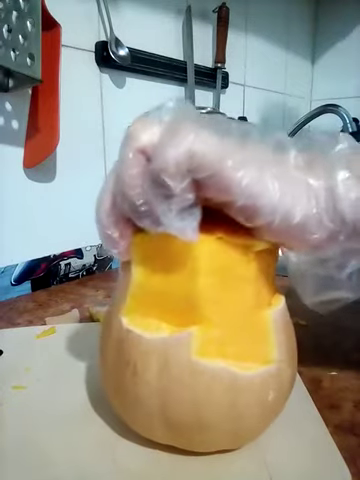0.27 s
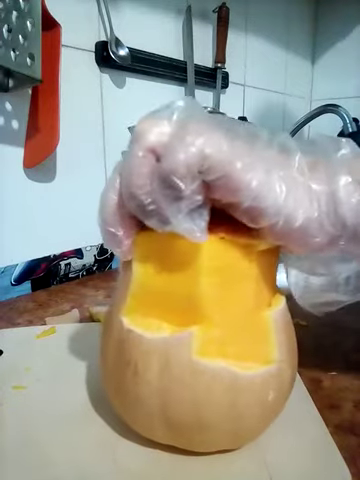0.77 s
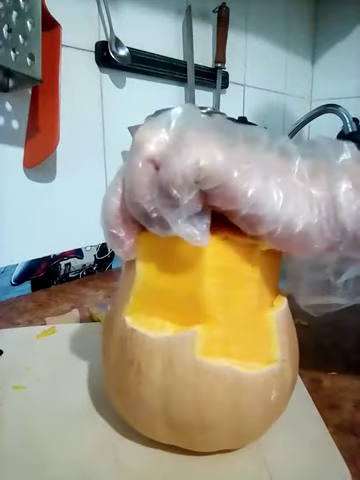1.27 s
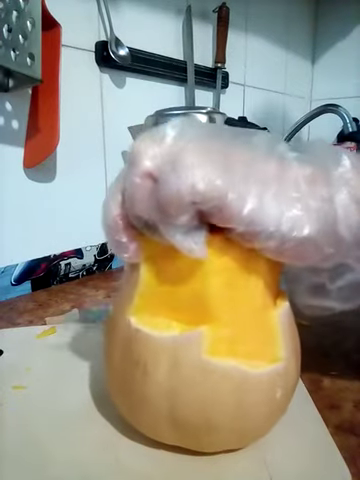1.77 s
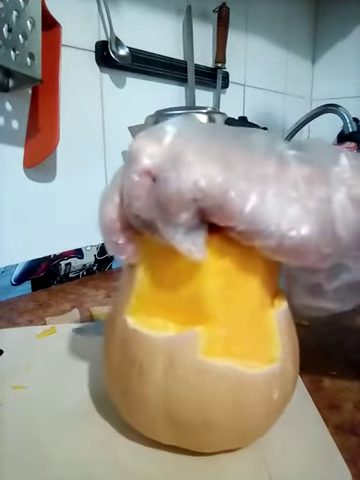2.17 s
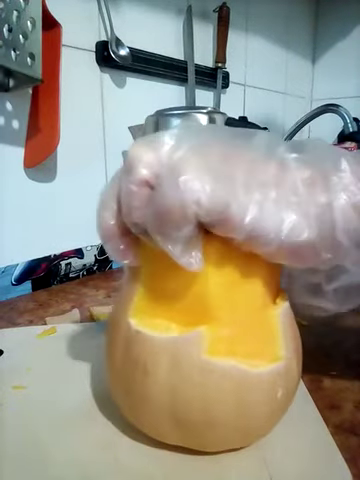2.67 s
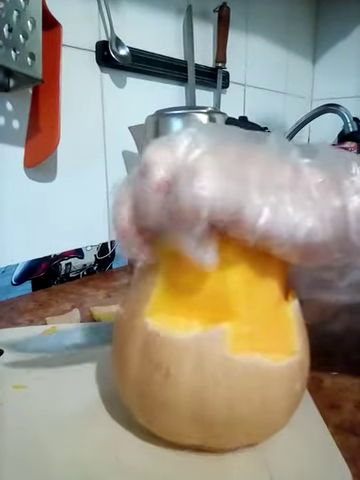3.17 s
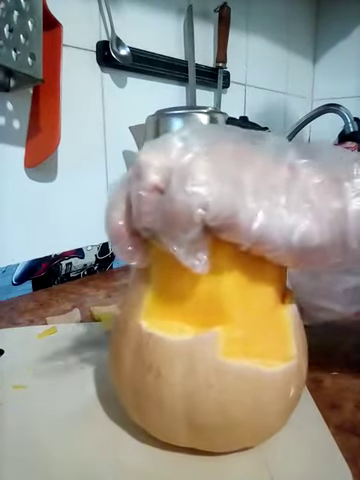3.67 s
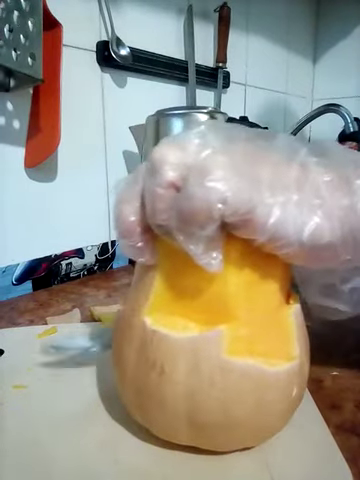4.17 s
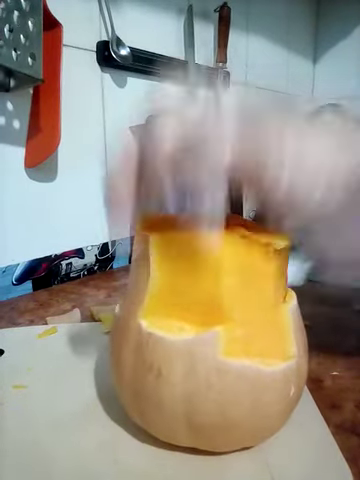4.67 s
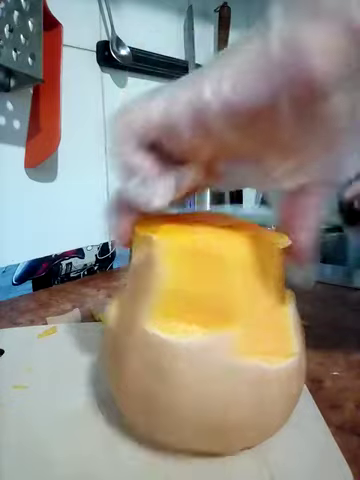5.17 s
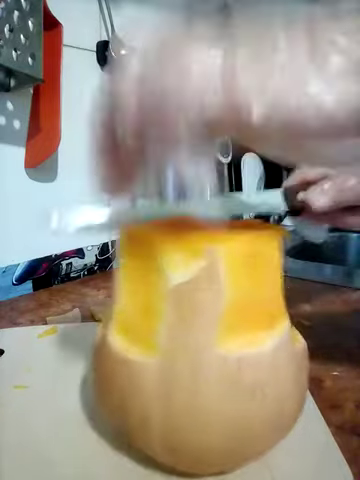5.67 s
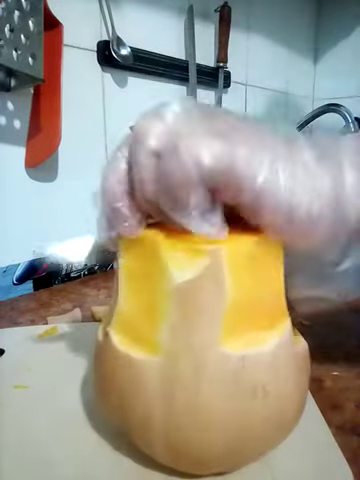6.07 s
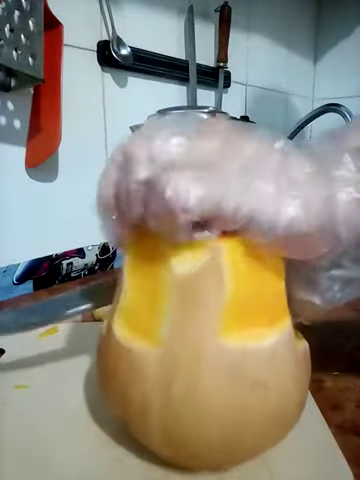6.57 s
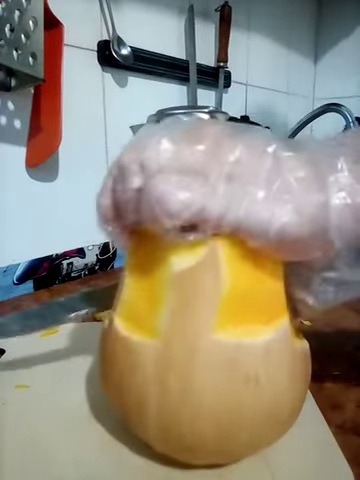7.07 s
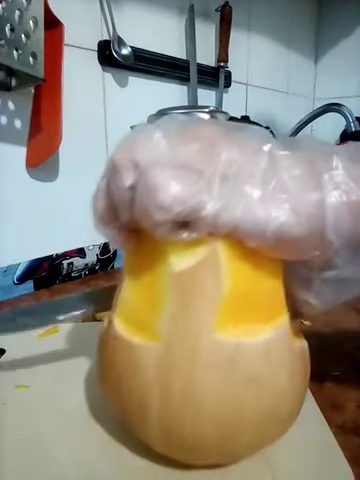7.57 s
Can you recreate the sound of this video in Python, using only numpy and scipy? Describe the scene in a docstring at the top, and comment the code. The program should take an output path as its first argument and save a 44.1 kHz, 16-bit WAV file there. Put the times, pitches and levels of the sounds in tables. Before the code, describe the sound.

Close kitchen paring: crisp plastic film crackling, wet vegetable rasps, soft thumps of a heavy fruit, and loud snapping knocks around three and four seconds.

```python
"""A tiled kitchen: a gloved hand steadies a squash on a cutting board while a knife pares off its rind. The
flesh rasps and the thin plastic glove crinkles: clumped random snaps, shaped by spectra and hand effort. Three
knocks on the board are damped modes with boom and chatter; two come with a loud volley of rind snaps. The steel
sings in damped modes and squeaks in hoarse gliding bands; soft noise-and-sine thumps rock the fruit, and one
marks the falling peel. Faint room air and hum lie beneath."""
import sys
import numpy as np
from scipy import signal
from scipy.fft import rfft, irfft, next_fast_len
from scipy.io import wavfile
from scipy.ndimage import uniform_filter1d, map_coordinates

SR = 44100
rng = np.random.default_rng(int(sys.argv[2]) if len(sys.argv) > 2 else 0)


def master_out(mix):
    """Clip the mix to full scale and print it as 16-bit PCM to the path in sys.argv[1]."""
    frames = np.transpose(np.atleast_2d(mix))
    ceiling = np.clip(frames, -1, 1)
    pcm = np.round(ceiling * 32767).astype(np.int16)
    wavfile.write(sys.argv[1], SR, pcm)


N = 347067
TIME_S = np.arange(N) / SR
AGE_S = TIME_S[:SR]  # time since an event began


def amp(db):
    """Decibels to gain."""
    return 10 ** (np.asarray(db) / 20)


def unit(x):
    """Scale to rms 1."""
    return x / np.sqrt(np.mean(x ** 2) + 1e-20)


def along(points, hz):
    """(Hz, value) points interpolated on a log frequency axis."""
    point_hz, values = np.transpose(points)
    return np.interp(np.log(hz + 1), np.log(point_hz), values)


def wobble(knots_per_s, size=N):
    """Smooth random curve through normally distributed knots."""
    knots = rng.standard_normal(int(size * knots_per_s / SR) + 4)
    return map_coordinates(knots, [np.arange(size) * knots_per_s / SR])


def add(track, at_s, sound):
    """Mix a sound into the track at a given time."""
    start = max(0, round(at_s * SR))
    track[start:start + len(sound)] += sound[:max(0, N - start)]


def response(spectrum, size=2048):
    """Minimum-phase impulse response of energy 1, by folding the cepstrum."""
    gains = amp(along(spectrum, np.fft.rfftfreq(size, 1 / SR)))
    cepstrum = irfft(np.log(gains))
    cepstrum[1:size // 2] *= 2
    cepstrum[size // 2 + 1:] = 0
    impulse = irfft(np.exp(rfft(cepstrum)))
    return impulse / np.linalg.norm(impulse)


def coloured(x, spectrum):
    """Filter x to the given spectrum."""
    return signal.fftconvolve(x, response(spectrum))[:len(x)]


def crackle(spectrum, snaps_per_s, spread_db, clump_db, clumps_per_s, size=N):
    """Tiny snaps of uneven size that come in clumps; rms 1."""
    happens = rng.random(size) < snaps_per_s / SR
    snaps = happens * rng.choice([-1, 1], size)
    uneven_db = spread_db * np.clip(rng.standard_normal(size), -2, 2)
    clumping_db = clump_db * np.clip(wobble(clumps_per_s, size), -2, 2)
    return unit(coloured(snaps * amp(uneven_db + clumping_db), spectrum))


def ring(modes, attack_s, scatter_db=1):
    """Damped modes of alternating sign, struck at randomly scattered strengths."""
    total = np.zeros(SR)
    for k, (hz, db, t60_s) in enumerate(modes):
        decay = amp(db + scatter_db * rng.standard_normal() - 60 * AGE_S / t60_s)
        total += (-1) ** k * decay * np.sin(2 * np.pi * hz * AGE_S)
    return total * (1 - np.exp(-AGE_S / attack_s))


def effort(moves, rise_db_per_s, fall_db_per_s):
    """Gain of a series of hand movements: each swells, holds and dies away."""
    power = np.zeros(N)
    for at_s, hold_s, db in moves:
        before_db = rise_db_per_s * np.maximum(at_s - TIME_S, 0)
        after_db = fall_db_per_s * np.maximum(TIME_S - at_s - hold_s, 0)
        lull_db = before_db + after_db
        near = lull_db < 60
        power[near] += amp(db - lull_db[near]) ** 2
    return np.sqrt(power)


def shifting(x, depth_db):
    """The colour drifts in patches as the fingers and the point of contact move."""
    bins = signal.stft(x, nperseg=512)[2]
    field = uniform_filter1d(rng.standard_normal(bins.shape), size=4, axis=0)
    field = uniform_filter1d(field, size=18, axis=1)
    return unit(signal.istft(bins * amp(depth_db * unit(field)), nperseg=512)[1][:len(x)])


# decay of the tiled room: (frequency [Hz], T60 [s])
TILE_DECAY = [(100, 0.61), (250, 0.37), (1000, 0.3), (4000, 0.51), (6500, 0.12), (9000, 0.37),
              (15000, 0.32)]


def kitchen(x, wet_db):
    """A sound and the answer of the tiled walls, which builds up over a few milliseconds."""
    hz, t_s, bins = signal.stft(rng.standard_normal(SR), SR, nperseg=256)
    decay = amp(-60 * t_s / along(TILE_DECAY, hz)[:, None])
    tail = signal.istft(bins * decay, SR, nperseg=256)[1][:SR]
    tail = tail * (1 - np.exp(-(AGE_S / 0.0016) ** 2))
    return x + amp(wet_db) * signal.fftconvolve(x, tail / np.linalg.norm(tail))[:len(x)]


# knife pushed through the flesh: (time [s], hold [s], level [dB])
STROKES = [(0, .02, -66), (.435, 0.084, -73.5), (1.03, 0.29, -53.5), (1.45, 0.23, -56),
           (1.77, 0.041, -54.5), (1.88, 0.035, -47), (2.11, 0.087, -51), (2.315, 0.016, -53),
           (2.495, 0.019, -50), (2.66, .04, -54), (2.82, 0.11, -65), (3.12, 0.014, -58.5),
           (3.56, 0.23, -64.5), (3.89, 0.14, -61), (4.46, 0.099, -46.5), (4.915, 0.034, -56.5),
           (5.05, 0.63, -64), (5.92, 0.26, -49.5), (6.16, 0.094, -49), (6.39, .04, -56), (6.52, 0.007, -50),
           (6.67, 0.11, -59), (6.87, 0.028, -56.5), (7.05, 0.1, -52.5), (7.41, 0.058, -54.5),
           (7.6, 0.21, -58.5)]
STROKE_RISE_DB_PER_S, STROKE_FALL_DB_PER_S = 249, 120.5  # the edge takes up the load, then runs out
# dull ticks as the blade bites: (time [s], level [dB])
BITES = [(.428, -49), (.959, -54), (1.011, -40.5), (1.309, -46), (1.472, -50), (1.542, -43.5), (1.557, -40),
         (1.592, -40), (3.26, -40), (6.516, -37), (7.436, -40), (7.729, -42.5)]
# flesh spectrum: (frequency [Hz], relative density [dB per Hz])
FLESH_SPECTRUM = [(150, -7.5), (330, -10), (430, -3.5), (530, -3.5), (640, -2.5), (1050, -5), (1300, -3),
                  (1700, -4.5), (2500, -7), (3400, -3.5), (4200, -8), (6000, -1), (8000, -25.5),
                  (15000, -74)]


def paring():
    """Cells of the flesh burst ahead of the edge; tougher spots give way with a tick."""
    cells = crackle(FLESH_SPECTRUM, snaps_per_s=1800, spread_db=2.0, clump_db=1, clumps_per_s=69)
    push = effort(STROKES, STROKE_RISE_DB_PER_S, STROKE_FALL_DB_PER_S)
    rasp = push * shifting(cells, depth_db=4)
    for at_s, db in BITES:
        burst = rng.standard_normal(SR) * amp(-60 * AGE_S / 0.014)
        add(rasp, at_s, amp(db) * coloured(burst, FLESH_SPECTRUM))
    return kitchen(rasp, wet_db=-8)


# fingers shift their grip: (time [s], hold [s], level [dB])
GRIPS = [(0, 0.16, -63.5), (.23, .04, -63.5), (.435, 0.15, -65), (.795, 0.0087, -70.5),
         (1.14, 0.035, -52.5), (1.27, 0.045, -52), (1.4, 0.057, -52), (1.6, 0.052, -49), (1.8, 0.18, -58),
         (2.13, 0.087, -50), (2.345, 0.018, -49), (2.46, 0.023, -45), (2.665, 0.014, -44.5),
         (2.9, 0.1, -56), (3.1, 0.071, -58), (3.5, 0.24, -55.5), (3.915, 0.031, -54), (4.52, 0.046, -44),
         (4.84, 0.033, -54.5), (4.915, 0.022, -44.5), (5.05, 0.27, -52), (5.4, 0.24, -51.5),
         (5.85, 0.25, -48.5), (6.185, 0.028, -43), (6.29, 0.028, -48), (6.41, 0.028, -49.5),
         (6.51, 0.017, -42.5), (6.68, 0.056, -49), (6.82, 0.095, -55), (7.03, .17, -48.5),
         (7.34, .01, -56.5), (7.43, 0.06, -55), (7.585, 0.022, -49.5), (7.72, 0.11, -55.5)]
GRIP_RISE_DB_PER_S, GRIP_FALL_DB_PER_S = 283, 126  # the film tightens quickly and relaxes slowly
HOLD_FROM_S, HOLD_DB = 1.05, -66.5  # once the hand bears down, the film is never quite still
WRINKLES_PER_S, WRINKLE_DB = 45, -12.5  # smaller folds that flip at random, level against the snaps
# single creases flip over: (time [s], dry peak level [dB])
CREASES = [(0.1022, -34), (0.2194, -44), (1.1453, -36), (1.2466, -37), (1.263, -34), (1.5409, -35),
           (1.5564, -29), (1.5923, -28), (2.3226, -32), (2.607, -39), (3.2161, -38), (3.8706, -43),
           (4.1046, -44), (4.9167, -29), (5.1966, -35), (5.218, -36), (5.237, -32), (5.8202, -34),
           (6.4063, -27), (6.7306, -31), (7.002, -33), (7.1202, -31), (7.198, -28)]
CREASE_TOP_HZ = 10500  # a whole crease is larger and flips with less fizz
# glove film spectrum: (frequency [Hz], relative density [dB per Hz])
FILM_SPECTRUM = [(200, -29.5), (700, -22), (2400, -19.5), (3400, -14), (4500, -11), (5400, -3.5), (6400, 0),
                 (7100, -7.5), (8000, -23), (11000, -29.5), (15500, -39.5)]


def glove():
    """The film crinkles in dense small snaps, and now and then a wrinkle or a whole crease flips."""
    snaps = crackle(FILM_SPECTRUM, snaps_per_s=3600, spread_db=4.5, clump_db=1.7, clumps_per_s=180)
    folds = crackle(FILM_SPECTRUM, snaps_per_s=WRINKLES_PER_S, spread_db=3, clump_db=4, clumps_per_s=57)
    wrinkles = amp(WRINKLE_DB) * folds
    grip = effort(GRIPS, GRIP_RISE_DB_PER_S, GRIP_FALL_DB_PER_S)
    flexing = np.hypot(grip, amp(HOLD_DB) * (TIME_S > HOLD_FROM_S))
    crinkle = flexing * unit(shifting(snaps, depth_db=2.5) + wrinkles)

    creases = np.zeros(N)
    lowpass = signal.butter(2, CREASE_TOP_HZ, fs=SR)
    for at_s, db in CREASES:
        flip = rng.standard_normal(SR // 10) * amp(-60 * AGE_S[:SR // 10] / 0.008)
        snap = signal.lfilter(*lowpass, coloured(flip, FILM_SPECTRUM))
        add(creases, at_s, amp(db) * snap / np.abs(snap).max())
    return kitchen(crinkle, wet_db=-9.5) + kitchen(creases, wet_db=-7.5)


# blade meets board: (time [s], knock gain [dB], pitch factor of the spot [ratio], brightness [Hz],
# worktop boom gain [dB], clatter gain before trim [dB], clatter T60 [s])
CHOPS = [(1.8928, -17.5, 1.126, 2850, -39, -41.5, 0.2), (3.2744, -14.5, 0.95, 1400, -28, -33.5, 0.053),
         (4.3006, -9.5, 1, 5640, -16, -26, 0.41)]
# knife-on-board modes before the pitch factor: (frequency [Hz], relative level [dB], T60 [s])
BOARD_MODES = [(481, -12.5, 0.046), (581, -2, 0.019), (684, 0, 0.023), (991, -9, 0.059),
               (1250, -22, 0.0067), (1610, -13, 0.0078), (2160, 1.5, 0.0093), (2270, -16, 0.012),
               (3290, -6, 0.012), (4060, -1, 0.019)]
# worktop modes: (frequency [Hz], relative level [dB], T60 [s])
WORKTOP_MODES = [(244.6, 0.5, 0.12), (247.3, -20.5, 0.56), (187, -16.5, 0.18), (301, -12.5, 0.11)]
# blade and board chattering together: (frequency [Hz], relative level [dB], T60 [s])
CLATTER_MODES = [(548, -3.5, 0.015), (698, -6.5, 0.018), (944, -8.5, 0.017), (1220, -14.5, 0.024),
                 (1504, -7, 0.019), (2000, -0.5, 0.0088), (2780, -7.5, 0.0085), (3100, -7.5, 0.012),
                 (4220, -0.5, 0.0065), (5240, -5, 0.0086), (5680, -1.5, 0.0067), (6620, -6.5, .006)]
# steel tapping the board: (frequency [Hz], relative density [dB per Hz])
CONTACT_SPECTRUM = [(100, -12), (500, 0), (6500, 5), (7500, -7.5), (8500, -12.5), (15000, -50)]


def chops():
    """The freed blade knocks on the board and chatters there; the worktop booms beneath."""
    track = np.zeros(N)
    for at_s, knock_db, pitch, bright_hz, boom_db, clatter_db, clatter_t60_s in CHOPS:
        cushion = signal.butter(2, bright_hz, fs=SR)  # a cushioned blow loses its treble
        modes = [(hz * pitch, db, t60_s) for hz, db, t60_s in BOARD_MODES]
        contact = unit(coloured(rng.standard_normal(SR), CONTACT_SPECTRUM))
        crack = amp(-5) * np.exp(-(AGE_S / 0.005) ** 4) * contact
        struck = ring(modes, attack_s=0.0013, scatter_db=1.5) + crack
        knock = amp(knock_db) * signal.lfilter(*cushion, struck)

        boom = amp(boom_db) * ring(WORKTOP_MODES, attack_s=0.0039)

        taps = crackle(CONTACT_SPECTRUM, snaps_per_s=6000, spread_db=1.5, clump_db=-2.5,
                       clumps_per_s=640, size=SR)
        fading_taps = amp(clatter_db - 60 * AGE_S / clatter_t60_s) * taps
        steel = signal.lfilter(*cushion, ring(CLATTER_MODES, attack_s=0.000081))
        clatter = 0.91 * signal.fftconvolve(fading_taps, steel / np.linalg.norm(steel))[:SR]

        add(track, at_s, kitchen(knock, wet_db=-7.0))
        add(track, at_s, kitchen(boom, wet_db=-9.0))
        add(track, at_s, kitchen(clatter, wet_db=-1))
    return track


# rind splits: (time [s], level [dB], tear length [s], T60 [s])
SPLITS = [(3.26, -55, .005, 0.045), (3.2745, -18.5, 0.043, 0.087), (3.331, -23.5, 0.015, 0.33),
          (4.278, -49.5, 0.0079, 0.072), (4.301, -28, 0.029, 0.37)]
# rind spectrum: (frequency [Hz], relative density [dB per Hz])
RIND_SPECTRUM = [(150, -35), (600, -22), (1100, -15.5), (2500, -19.5), (4300, -13.5), (5200, -4),
                 (6000, 0.5), (6700, -5), (7400, -16), (8200, -29), (12000, -39), (15500, -49)]


def splits():
    """A crack runs through the rind as a volley of sharp snaps."""
    track = np.zeros(N)
    for at_s, db, length_s, t60_s in SPLITS:
        volley = crackle(RIND_SPECTRUM, snaps_per_s=2500, spread_db=0, clump_db=0.5,
                         clumps_per_s=210, size=SR)
        fade = amp(db - 60 * np.maximum(AGE_S - length_s, 0) / t60_s)
        add(track, at_s, kitchen(fade * volley, wet_db=-4.5))
    return track


# singing blade modes: (frequency [Hz], relative level [dB], T60 [s])
BLADE_MODES = [(1900, 6, 0.046), (1960, -9.5, 0.15), (2040, -5, .14), (2950, -12, 0.11), (3800, -11, 0.11),
               (4220, -9, 0.09), (5610, -10, 0.16), (5650, 5, 0.043)]
# steel still ringing faintly at the outset: (frequency [Hz], level [dB], T60 [s])
OUTSET_MODES = [(1785, -69.5, 1.7), (3080, -65, 0.12)]


def blade():
    """The steel sings briefly, juddering, as its edge is set to the rind."""
    steel = np.zeros(N)
    judder = amp(3 * wobble(400, SR))
    add(steel, 1.006, amp(-36.5) * ring(BLADE_MODES, attack_s=0.004) * judder)
    add(steel, 0, ring(OUTSET_MODES, attack_s=0.0017))
    return kitchen(steel, wet_db=-6.5)


# wet flat of the blade rubs: (time [s], length [s], starting pitch [Hz], level [dB])
SQUEAKS = [(1.281, 0.12, 1560, -59), (1.413, 0.088, 1670, -53.5), (1.55, 0.22, 1588, -60.5),
           (2.626, 0.097, 1370, -54.5), (2.757, 0.22, 1014, -64), (3.104, 0.057, 1414, -59),
           (6.049, 0.26, 1558, -56), (7.008, 0.295, 1290, -66), (7.644, 0.11, 1330, -57.5)]
SQUEAK_SAG_RATIO = 0.03  # share of its pitch that a note loses as the blade slows


def squeaks():
    """Uneven stick and slip of steel on wet flesh: a hoarse band that swells and glides."""
    track = np.zeros(N)
    for at_s, length_s, hz, db in SQUEAKS:
        progress = np.minimum(AGE_S / length_s, 1)
        phase = 2 * np.pi * np.cumsum(hz * (1 - SQUEAK_SAG_RATIO * progress)) / SR
        slips = wobble(480, SR) * np.cos(phase) + wobble(480, SR) * np.sin(phase)
        rub = unit(slips * amp(3.1 * wobble(112.4, SR)))
        add(track, at_s, amp(db) * np.sin(np.pi * progress) ** 2 * rub)
    return kitchen(track, wet_db=-4.0)


# squash rocks on the board, and at 4.47 s the pared peel drops onto it: (time [s], level [dB], pitch [Hz], rise
# [s])
THUMPS = [(.427, -50.5, 125, 0.016), (.979, -57, 192.4, 0.047), (1.636, -51, 140, 0.017),
          (1.935, -40, 164, 0.01), (2.156, -49, 152, 0.032), (2.478, -38, 175, 0.021),
          (2.7, -54, 145.5, 0.024), (3.1, -47.5, 120, 0.015), (3.281, -42.5, 151, 0.0099),
          (3.871, -36, 157, 0.0098), (4.47, -48.5, 241, 0.031), (5.503, -54.5, 159, 0.022),
          (5.591, -49.5, 160, .045), (5.72, -54.5, 151.7, 0.032), (6.041, -57.5, 156, .036),
          (6.526, -54, 154, 0.018), (6.568, -52, 124, 0.049), (6.719, -55, 161, 0.025),
          (7.07, -48.5, 149.7, 0.051), (7.262, -49.5, 132.5, 0.021), (7.609, -48.5, 126, 0.074),
          (7.81, -48, 156, .022)]
THUMP_T60_S, SETTLE_S_PER_RISE_S = 0.083, 5.1  # a slow roll also takes longer to settle


def thumps():
    """The heavy, soft fruit rolls onto its base, bobs on the board and shudders; once the pared peel drops onto
    the board."""
    track = np.zeros(N)
    for at_s, db, hz, rise_s in THUMPS:
        t60_s = THUMP_T60_S + SETTLE_S_PER_RISE_S * rise_s
        body = [(hz / 5, -22), (hz / 2.5, -3), (hz, 0), (hz * 1.5, -3), (hz * 2.6, -18),
                (hz * 10, -50), (hz * 30, -80)]
        shudder = unit(coloured(rng.standard_normal(SR), body))
        # the soft contact never holds its pitch
        bob = np.sin(2 * np.pi * hz * AGE_S + 0.87 * wobble(79, SR))
        swell = np.minimum(AGE_S / rise_s, 1) * amp(-60 * np.maximum(AGE_S - rise_s, 0) / t60_s)
        add(track, at_s, amp(db) * swell * unit(shudder + 0.7 * bob))
    return kitchen(track, wet_db=-8.0)


# room air spectrum: (frequency [Hz], relative density [dB per Hz])
AIR_SPECTRUM = [(15, -73.5), (25, -43), (70, -18), (80, -10), (102, -13.5), (127, -15.5), (335, -15.5),
                (373, -17), (489, -14.5), (531, -23.5), (695, -25), (6210, -38), (16000, -52)]
# appliance hum before its wavering: (frequency [Hz], level [dB])
HUM_TONES = [(99, -70.5), (151, -76)]


def background():
    """Still room air as coloured noise, and the faint, wavering hum of an appliance as sines."""
    track = amp(-68.0) * unit(coloured(rng.standard_normal(N), AIR_SPECTRUM))
    for hz, db in HUM_TONES:
        level = amp(db + 1.7 * wobble(7.0))
        track += level * np.sin(2 * np.pi * hz * TIME_S + 0.5 * wobble(2.6))
    return track


def scene():
    """Hand, knife and fruit in the kitchen, as one channel."""
    cutting = paring() + glove() + chops() + splits()
    handling = blade() + squeaks() + thumps()
    return (cutting + handling + background())[None]


TOP_HZ = 15600


def record(dry):
    """The microphone keeps nothing above its band limit."""
    size = next_fast_len(N + SR)
    in_band = np.fft.rfftfreq(size, 1 / SR) < TOP_HZ
    return irfft(rfft(dry, size) * in_band, size)[..., :N]


dry = scene()
out = record(dry)
master_out(out)
```